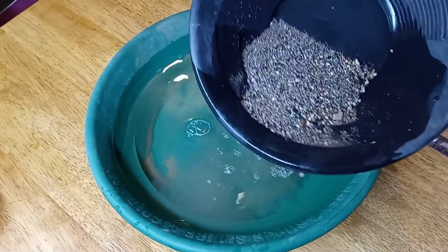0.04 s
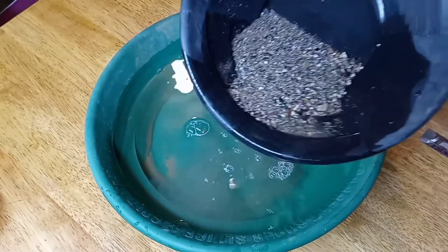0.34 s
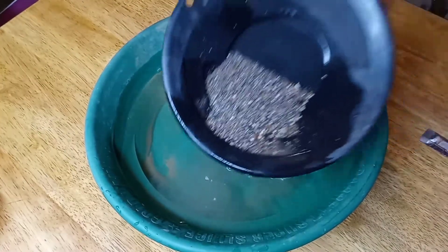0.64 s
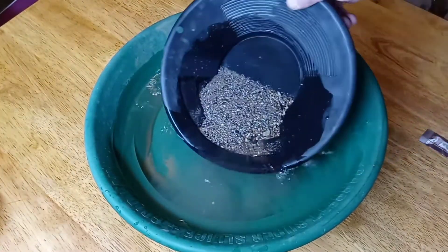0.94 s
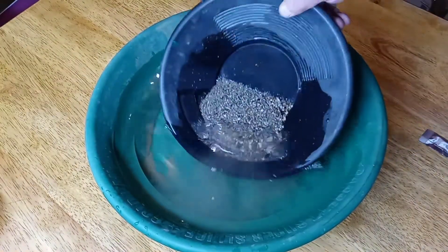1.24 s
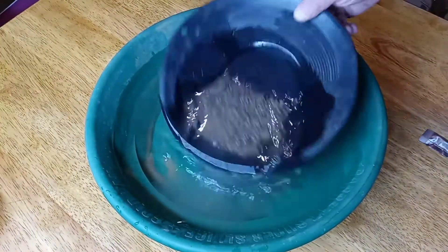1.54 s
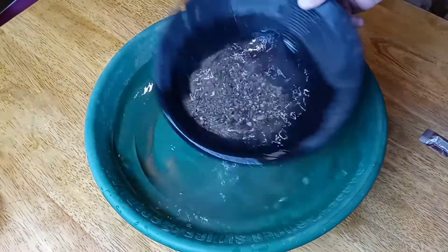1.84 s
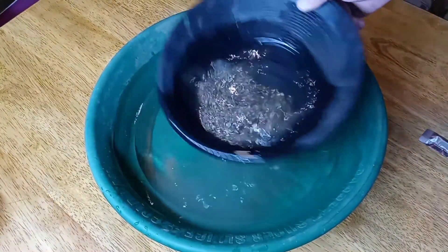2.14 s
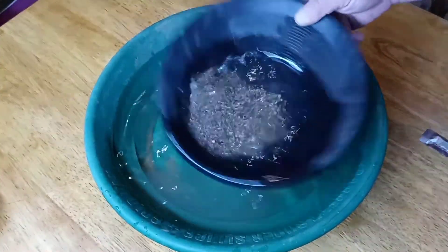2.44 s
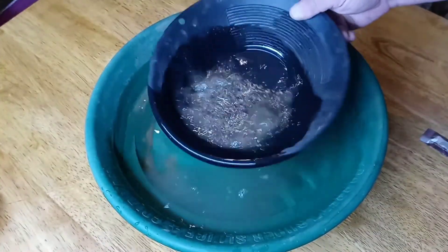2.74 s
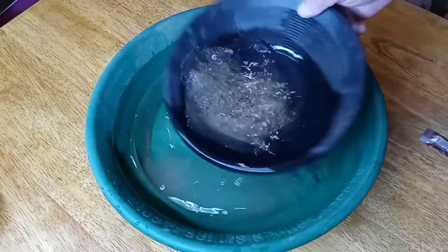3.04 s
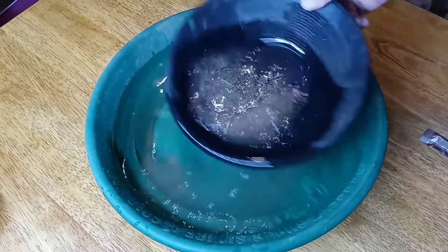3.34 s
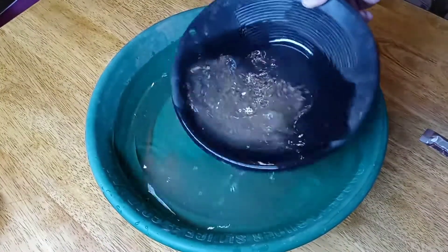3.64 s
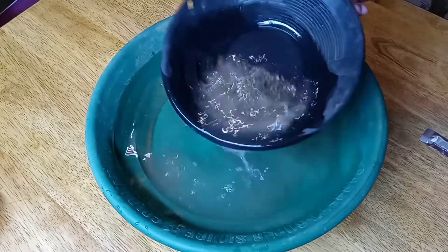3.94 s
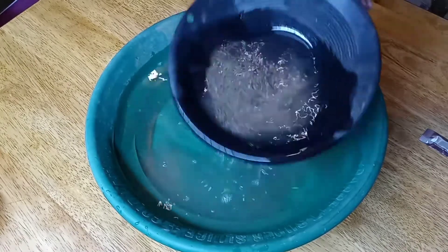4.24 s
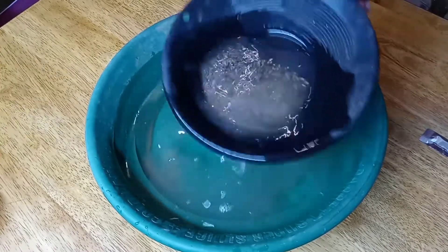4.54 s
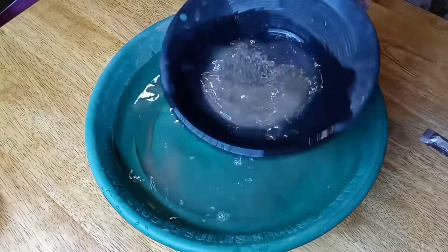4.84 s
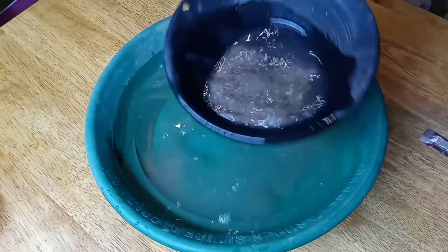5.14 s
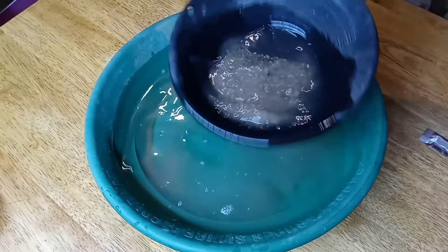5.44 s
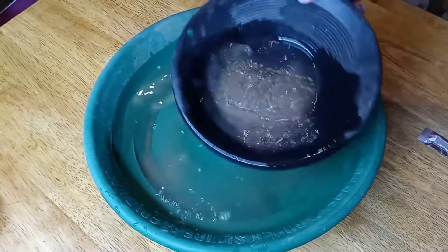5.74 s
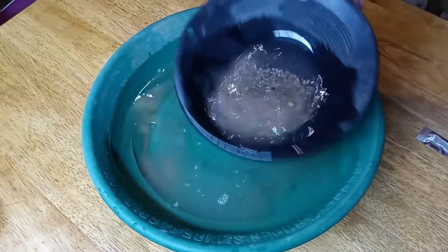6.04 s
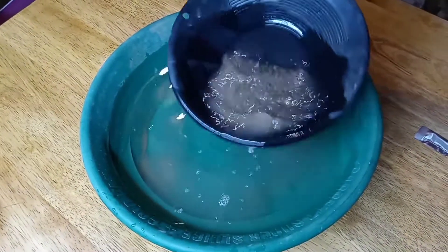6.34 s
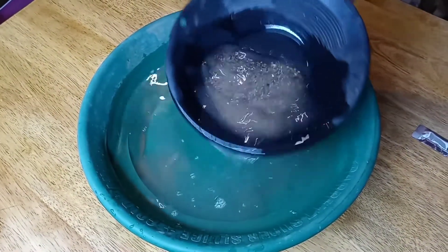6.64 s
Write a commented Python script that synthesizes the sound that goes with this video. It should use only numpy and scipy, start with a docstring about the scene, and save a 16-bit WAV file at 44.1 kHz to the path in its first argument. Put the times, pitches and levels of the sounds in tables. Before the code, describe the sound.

Heard close up in a small room, a plastic pan is handled and set into a tub of water with a scrape and a sharp knock. Water seeps quietly into its load. Then fast, rhythmic shaking drags wet gravel and hissing sand across the plastic while water sloshes and gurgles. A few stone clicks and dull bumps dot the swishing, which eases briefly and carries on over faint background hiss.

```python
"""Panning for gold at a tub of water in a small room, heard close on one microphone.
A plastic pan of sand and gravel is picked up, scuffs and knocks down in the tub; water seeps into the load.
From about 1.8 s it is shaken to and fro: each stroke drags wet gravel over the plastic (a rasp of tiny
collisions) and sloshes the water. Sand hisses, trapped air glugs, pebbles tick and the pan bumps the tub.
The room answers softly, over a faint steady rumble and hiss."""
import sys
import numpy as np
from scipy import signal
from scipy.fft import rfft, irfft
from scipy.io import wavfile

SR = 44100
rng = np.random.default_rng(int(sys.argv[2]) if len(sys.argv) > 2 else 0)


def store_pcm(level_fs):
    """Save levels as 16-bit WAV."""
    pcm = np.round(np.clip(level_fs, -1, 1) * 32767).astype(np.int16)
    wavfile.write(sys.argv[1], SR, np.atleast_2d(pcm).T)


N = 299880
TIME = np.arange(N) / SR

# strokes of the hand, pull and push in turn: fastest_s, level_db, half_length_s
STROKES = [(1.812, -51, 0.019), (1.899, -42, .016), (1.978, -45.5, 0.025), (2.101, -45.5, 0.021),
           (2.203, -45.5, .019), (2.299, -43, .019), (2.389, -43.5, .021), (2.49, -45, 0.022),
           (2.585, -45, 0.02), (2.669, -41.5, .018), (2.759, -43.5, .021), (2.851, -44.5, .018),
           (2.948, -45.5, 0.02), (3.041, -44.5, 0.024), (3.157, -44.5, 0.024), (3.216, -49.5, 0.047),
           (3.316, -43.5, 0.024), (3.423, -51.5, 0.03), (3.502, -49.5, 0.018), (3.615, -47, 0.027),
           (3.733, -47, 0.024), (3.845, -45.5, 0.022), (3.938, -46, 0.022), (4.048, -43.5, 0.022),
           (4.148, -44.5, 0.024), (4.255, -44.5, .024), (4.35, -48.5, .021), (4.442, -56.5, 0.053),
           (4.666, -52, 0.022), (4.774, -50, .022), (4.882, -52, 0.023), (5.024, -50, .022),
           (5.158, -54.5, 0.022), (5.278, -47.5, 0.02), (5.386, -52, 0.027), (5.506, -48.5, 0.017),
           (5.621, -50.5, .026), (5.754, -44, 0.024), (5.86, -48, .021), (5.963, -49, 0.022),
           (6.09, -52, .022), (6.204, -47, 0.02), (6.311, -49, 0.025), (6.435, -45.5, 0.022),
           (6.53, -48, 0.025), (6.661, -48, 0.034), (6.785, -49, 0.034)]
# gushes of water seeping into the dry gravel: centre_s, level_db, half_length_s
SEEP = [(1.165, -63, 0.022), (1.535, -69, 0.019), (1.61, -74.5, 0.087), (1.76, -73, 0.036)]
# colours of the four kinds of contact with the pan: frequency_hz, level_db
BRUSH = [(100, -22), (280, -8), (450, 2), (650, 2), (980, -7), (1200, -21), (3000, -31), (9000, -30.5)]
SCUFF = [(25, -50), (130, -16.5), (500, 7), (850, -5.5), (1400, -3), (2000, -8.5), (3500, -8), (4800, -13),
         (6500, -11.5), (12000, -27), (15500, -25)]
SCRAPE = [(25, -63), (380, -34), (600, -17), (1150, -21), (1600, -3), (2250, 0.5), (3000, -10), (4500, -12),
          (6400, -17), (10000, -25.5), (15500, -36)]
KNOCK = [(25, -64), (130, -9), (250, -4), (420, -10.5), (1200, -9), (1700, 2.5), (2200, 1), (2900, 2),
         (3800, -2), (5200, -2), (7500, -6), (10000, -6.5), (15500, -17.5)]


def amp(db):
    """Decibels to gain."""
    return 10 ** (np.asarray(db) / 20)


def unit_rms(x):
    """Scales to rms 1."""
    return x / np.sqrt(np.mean(x ** 2) + 1e-20)


def value_at(points, hz):
    """Reads rows of (frequency_hz, value) on a log-frequency axis."""
    f, value = np.transpose(points)
    return np.interp(np.log(hz + 1), np.log(f), value)


def add(mix, start_s, sound):
    """Mixes a sound in at start_s."""
    part = mix[max(round(start_s * SR), 0):][:len(sound)]
    part += sound[:len(part)]


def colour(x, spectrum):
    """Filters x by rows of (frequency_hz, level_db) and scales it to rms 1."""
    gain = amp(value_at(spectrum, np.fft.rfftfreq(len(x), 1 / SR)))
    return unit_rms(irfft(rfft(x) * gain, len(x)))


def flutter(hz):
    """A random wobble of rms 1, changing up to about hz times a second."""
    f = np.fft.rfftfreq(N, 1 / SR)
    return unit_rms(irfft(rfft(rng.standard_normal(N)) / (1 + (f / hz) ** 4), N))


def clicks(per_s, spread_db):
    """Random impacts: many small, a few large."""
    size = amp(spread_db * np.minimum(rng.exponential(1, N), 4))
    return size * rng.choice([-1, 1], N) * (rng.random(N) < per_s / SR)


def ring(hz, t60, glide=0., swell_cycles=0.19):
    """A dying sine that swells for a moment and may rise in pitch."""
    t = np.arange(int(t60 * SR) + 8) / SR
    tone = np.sin(2 * np.pi * hz * t * (1 + glide * t / t60))
    attack = 1 - np.exp(-t * hz / swell_cycles)
    wave = tone * attack * amp(-60 * t / t60)
    return wave / abs(wave).max()


def grains(lo_hz, hi_hz, cycles, per_s, spread_db, glide, count):
    """A swarm of short rings at count pitches, about even in energy per Hz."""
    out = np.zeros(N)
    for hz in np.linspace(lo_hz, hi_hz, count):
        grain = ring(hz, cycles / hz, glide)
        out += signal.oaconvolve(clicks(per_s / count, spread_db), grain / np.linalg.norm(grain))[:N]
    return unit_rms(out)


def resonate(x, hz, width_hz):
    """A resonance of gain 1 that follows the curve hz."""
    turn = np.exp(2j * np.pi * np.cumsum(hz) / SR)
    pole = np.exp(-np.pi * width_hz / SR)
    return 2 * (turn * signal.lfilter([1 - pole], [1, -pole], x / turn)).real


def swells(rows):
    """Gain over time from bell-shaped swells (centre_s, level_db, half_length_s) whose powers add."""
    centre_s, db, half_s = np.transpose(rows)[:, :, None]
    t = TIME[::32]
    power = amp(db) ** 2 * np.exp(-.5 * ((t - centre_s) / half_s) ** 2)
    return np.interp(TIME, t, np.sqrt(power.sum(0)))


def stroke_gain(stretch=1, follow=1, lead_s=0, push_db=0, pivot_db=-51.5):
    """One swell a stroke; a layer may last longer, follow the effort less, lead or favour pushes."""
    fastest_s, effort_db, half_s = np.transpose(STROKES)
    push = np.resize([-1, 1], len(STROKES))
    db = pivot_db + follow * (effort_db - pivot_db) + push_db * push
    return swells(np.column_stack([fastest_s - lead_s, db, half_s * stretch]))


def gravel(pings_db=-7, rough_db=0.9, gain_db=-1):
    """Coarse grit scrapes the plastic and small bubbles ping as the pan moves or water seeps in."""
    # colour of the rasp: frequency_hz, level_db
    rasp_spectrum = [(300, -27), (700, -10), (1200, -1.5), (1600, -1), (2300, 0.5), (3050, 3), (3800, -1.5),
                     (4900, 1.5), (5600, -1.5), (6500, 2.5), (7400, -0.5), (8400, 2), (10000, -1.5),
                     (11800, -7), (15500, -8)]
    grit = grains(1200, 15000, cycles=11, per_s=6000, spread_db=3.0, glide=0, count=24)
    pings = grains(1400, 6000, cycles=60, per_s=420, spread_db=2.6, glide=.04, count=36)
    bed = grit + amp(pings_db) * pings + rng.standard_normal(N)
    rasp = colour(bed, rasp_spectrum) * amp(rough_db * flutter(54))
    sliding = amp(gain_db) * stroke_gain(stretch=0.98, follow=1.13, lead_s=-0.00028)
    return rasp * (sliding + swells(SEEP))


def sand(gain_db=-9):
    """Fine sand hisses with each stroke, gentle or hard."""
    # colour of the hiss: frequency_hz, level_db
    sand_spectrum = [(1000, -20.5), (3000, 2.5), (4900, 3), (5600, -6.5), (6500, -2.5), (7400, -8.5),
                     (8400, -9), (10000, -16), (11800, -16.5), (15500, -16)]
    hiss = colour(clicks(per_s=14000, spread_db=3.4), sand_spectrum)
    return amp(gain_db) * hiss * stroke_gain(stretch=1.02, follow=0.44, lead_s=-0.0011)


def silt(stir_s=1.75, rise_s=0.033, gain_db=-61):
    """The finest sand, stirred up at the first stroke, stays afloat and whispers from then on."""
    # colour of the whisper: frequency_hz, level_db
    silt_spectrum = [(1000, -24), (3000, -10), (5000, 0), (6500, 0), (7500, -2.5), (9500, 0), (12000, -7.5),
                     (15500, -9)]
    whisper = colour(clicks(per_s=12000, spread_db=2.6), silt_spectrum)
    return amp(gain_db) * whisper * np.clip((TIME - stir_s) / rise_s, 0, 1)


def slosh(wave, bubbles_db=-7, swing_share=0.069, wander_share=0.026, wave_db=-5, seep_db=-6):
    """Each wave through the gravel rings bubbles and the hollow between the water and the pan wall."""
    # colour of the bubbles: frequency_hz, level_db
    bubble_spectrum = [(200, -28), (520, -11.5), (680, -9), (790, -4), (900, -10.5), (1080, -21.5),
                       (1230, -26.5), (1450, -12), (1750, -18), (3000, -7.5), (8000, -45)]
    # the hollow's base pitch, which sinks while the pan is held deeper: time_s, pitch_hz
    hollow = [(1.8, 930), (3.3, 912), (4.4, 888), (4.72, 760), (5.0, 820), (5.2, 956), (5.75, 866),
              (6.2, 940), (6.8, 936)]
    # resonances of the hollow: pitch_ratio, width_hz, level_db
    hollow_modes = [(.97, 90, -0.5), (1.15, 112, -2.5), (1.621, 150, -5), (1.95, 220, -10.5)]
    bubbles = grains(700, 2600, cycles=38, per_s=650, spread_db=2.2, glide=.04, count=32)
    fastest_s = np.transpose(STROKES)[0]
    swing = np.interp(TIME, fastest_s, np.resize([1, -1], len(STROKES)))  # pulls higher, pushes lower
    bend = 1 + swing_share * swing + wander_share * flutter(33.5)
    pitch = np.interp(TIME, *np.transpose(hollow)) * bend
    stirring = clicks(per_s=900, spread_db=1.46)
    ringing = np.zeros(N)
    for ratio, width_hz, db in hollow_modes:
        hz = ratio * pitch
        ringing += amp(db) * resonate(resonate(stirring, hz, width_hz), hz, width_hz)
    water = unit_rms(amp(bubbles_db) * colour(bubbles, bubble_spectrum) + unit_rms(ringing))
    return water * (amp(wave_db) * wave + amp(seep_db) * swells(SEEP))


def gurgle(gain_db=-4):
    """Deeper bubbles ring in the tub as the water churns round the pan."""
    # how strongly the strokes churn the water: time_s, relative_db
    churn = [(1.8, -14.5), (2.9, -14), (3.8, -19), (4.95, -14), (5.2, -19.5), (5.8, -25.5), (6.3, -33),
             (6.5, -20.5), (6.8, -20)]
    # the pan dips deeper and water surges round it: centre_s, level_db, half_length_s
    surges = [(1.94, -64, 0.048), (2.645, -61, 0.008), (3.19, -47.5, 0.025), (3.51, -50, 0.013),
              (4.865, -63, 0.023), (5.29, -60, 0.0078)]
    # colour of the churning water: frequency_hz, level_db
    gurgle_spectrum = [(30, -50), (130, -5), (230, -6), (330, 0.5), (450, 9.5), (590, 5), (700, -1),
                       (1200, 17), (4000, -24)]
    bubbles = grains(231, 890, cycles=21.0, per_s=400, spread_db=0.5, glide=0.044, count=14)
    water = colour(bubbles + .5 * rng.standard_normal(N), gurgle_spectrum)
    churning = amp(np.interp(TIME, *np.transpose(churn))) * stroke_gain(stretch=1.63)
    return amp(gain_db) * water * np.hypot(churning, swells(surges))


def stray_bubbles(wave, lo_hz=800, hi_hz=5500, gain_db=1, spread_db=3, cycles=42, count=170):
    """Lesser bubbles break off at random, their loudness following the wave that frees them."""
    out = np.zeros(N)
    for when, height, strength in rng.random((count, 3)):
        at = int(when * N)
        hz = lo_hz * (hi_hz / lo_hz) ** height
        gain = wave[at] * amp(gain_db + spread_db * (2 * strength - 1))
        add(out, at / SR, gain * ring(hz, cycles / hz, glide=0.021, swell_cycles=0.3))
    return out


def pan_body(drive):
    """The wet pan's modes ring on top of what drives them."""
    # modes of the plastic: pitch_hz, width_hz, level_db
    pan_modes = [(603, 12, 11), (885, 35, -11), (1452, 30, -3), (1940, 30, -6), (3040, 60, -10)]
    return drive + sum(amp(db) * signal.lfilter(*signal.iirpeak(hz, hz / width_hz, SR), drive)
                       for hz, width_hz, db in pan_modes)


def glugs(cycles=46, gain_db=-1):
    """Single bubbles ring briefly, rising in pitch as they near the surface."""
    # the loudest bubbles, from tiny chirps to deep glugs: start_s, pitch_hz, level_db
    bubbles = [(1.763, 9600, -40.5), (1.775, 9800, -35.5), (1.927, 1104, -33.5), (1.935, 257, -51.5),
               (1.938, 3930, -34.5), (1.963, 2780, -37.5), (3.298, 884, -45), (3.338, 2430, -39),
               (3.498, 668, -40), (3.514, 390, -50), (4.025, 908, -38), (4.041, 924, -37.5),
               (4.054, 853, -40), (4.573, 10200, -39), (4.753, 750, -47), (5.715, 775, -40),
               (6.306, 1400, -41), (6.568, 1380, -44)]
    out = np.zeros(N)
    for start_s, hz, db in bubbles:
        add(out, start_s, amp(db + gain_db) * ring(hz, cycles / hz, glide=0.021, swell_cycles=0.67))
    return out


def pebbles(gain_db=-3.5, t60=.007, width_hz=1900):
    """A stone strikes a stone: a crack a few milliseconds long, brightest round the stone's pitch."""
    # single pebbles clicking: time_s, level_db, pitch_hz
    strikes = [(1.8711, -32, 4050), (2.4808, -23.5, 9340), (4.1959, -28, 5110), (4.8484, -37.5, 3400),
               (5.0135, -37, 4180), (5.4969, -31.5, 5090), (5.7523, -24.5, 7220), (5.7624, -27, 6520),
               (5.7774, -28, 6310), (5.7924, -29, 10500)]
    out = np.zeros(N)
    t, f = np.arange(512) / SR, np.fft.rfftfreq(512, 1 / SR)
    for time_s, db, hz in strikes:
        band = 1 / (1 + ((f - hz) / width_hz) ** 2)
        crack = unit_rms(irfft(band * np.exp(2j * np.pi * rng.random(len(f)))))
        add(out, time_s + .001, amp(db + gain_db - 60 * t / t60) * crack)
    return out


def handling():
    """The pan slides in the hand, scuffs, scrapes the tub and knocks down; each blow rattles its load."""
    # the pan is handled, set down and slapped by the water: peak_s, level_db, rise_s, t60_s, spectrum
    contacts = [(0.276, -47.5, 0.0083, 0.12, SCUFF), (0.676, -51.5, 0.027, 0.064, SCUFF),
                (0.902, -54, 0.0042, 0.09, SCRAPE), (0.912, -43.5, 0.0045, 0.22, SCRAPE),
                (0.96, -37, 0.0087, 0.12, SCRAPE), (.983, -26.5, 0.00092, 0.14, KNOCK),
                (3.499, -44, 0.0036, 0.054, BRUSH), (4.849, -48.5, 0.0015, 0.095, SCUFF)]
    # the pan slides in the grip: centre_s, level_db, half_length_s
    slides = [(.178, -60, 0.016), (.226, -58, .026)]
    out = colour(rng.standard_normal(N), BRUSH) * swells(slides) * amp(1.5 * flutter(60))
    for peak_s, db, rise_s, t60, spectrum in contacts:
        t = np.arange(-rise_s, t60, 1 / SR)
        envelope = np.minimum(1 + t / rise_s, 1) * amp(-60 * np.maximum(t, 0) / t60)
        impacts = clicks(per_s=5000, spread_db=0.97) + 0.19 * rng.standard_normal(N)
        rattle = colour(impacts[:SR], spectrum)
        add(out, peak_s - rise_s, amp(db) * envelope * rattle[:len(t)])
    return out


def bumps():
    """The tub and the table boom briefly when the pan touches them."""
    # dull bumps against the tub: start_s, peak_db, pitch_hz, t60_s
    touches = [(.215, -60.5, 122, 0.16), (0.989, -37, 243, 0.1), (.987, -70, 135, 0.11),
               (3.999, -41, 125, 0.15), (4.008, -45.5, 189, 0.059), (4.035, -44, 207, 0.08),
               (4.197, -60, 130, 0.23), (4.291, -55, 120, 0.1), (4.842, -53.5, 136, 0.062),
               (5.412, -56.5, 127, 0.13)]
    out = np.zeros(N)
    for start_s, db, hz, t60 in touches:
        add(out, start_s, amp(db) * ring(hz, t60, swell_cycles=1.1))
    return out


def tub_rumble(stroke_db=-32, seep_db=-11):
    """The rocking water keeps the tub rumbling softly."""
    # colour of the rumble: frequency_hz, level_db
    rumble_spectrum = [(25, -29), (70, -1), (120, -1), (190, -11.5), (400, -28), (2000, -64)]
    sway = amp(stroke_db) * stroke_gain(stretch=2.4, follow=0.45) + amp(seep_db) * swells(SEEP)
    return colour(rng.standard_normal(N), rumble_spectrum) * sway * amp(2.9 * flutter(22))


def room(x, gap_s=.004):
    """Dense reflections of a small room, each band dying at its own speed."""
    # decay of the room: frequency_hz, t60_s
    decay_times = [(120, 0.44), (500, 0.29), (2500, 0.32), (6000, 0.34), (12000, 0.24)]
    taps = rng.standard_normal(SR // 2) * (np.arange(SR // 2) > gap_s * SR)
    hz, t, bands = signal.stft(taps, SR, nperseg=256)
    decay = amp(-60 * t / value_at(decay_times, hz)[:, None])
    tail = signal.istft(bands * decay, SR, nperseg=256)[1]
    return signal.fftconvolve(x, tail / np.linalg.norm(tail))[:N]


def room_tone(gain_db=-68.5):
    """A faint steady rumble and hiss behind everything."""
    # colour of the background: frequency_hz, level_db
    quiet_spectrum = [(25, -31), (60, -1), (125, 13.5), (200, -1), (500, -3), (1500, -11.5), (4000, -14),
                      (6500, -9), (7700, -20.5), (9500, -6.5), (12500, -2.5), (15500, 1)]
    return amp(gain_db) * colour(rng.standard_normal(N), quiet_spectrum)


def scene(shaking_room_db=-17, knock_room_db=-5, bump_room_db=-12):
    """Pan and tub close to the microphone, the room behind them, in mono."""
    wave = stroke_gain(stretch=0.91, follow=0.76, lead_s=0.0045, push_db=0.5)  # pushes throw more water
    load = gravel() + sand() + silt() + slosh(wave) + gurgle() + stray_bubbles(wave)
    shaking = pan_body(load) + glugs() + pebbles()
    knocks, booms = handling(), bumps()
    # the pan's wall beams the shaking upward, so little of it reaches the room
    echo = room(amp(shaking_room_db) * shaking + amp(knock_room_db) * knocks + amp(bump_room_db) * booms)
    return (shaking + knocks + booms + echo + tub_rumble() + room_tone())[None]


def record(dry, edge_hz=15600):
    """The recorder's band limit: a steep low-pass."""
    low_pass = signal.firwin(511, edge_hz, window=("kaiser", 9), fs=SR)
    return signal.oaconvolve(dry, low_pass[None], "same")


dry = scene()
out = record(dry)
store_pcm(out)
```